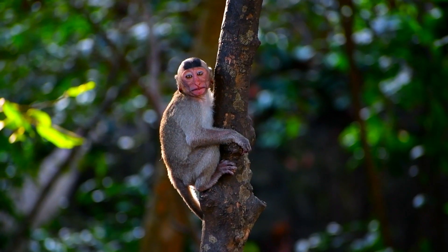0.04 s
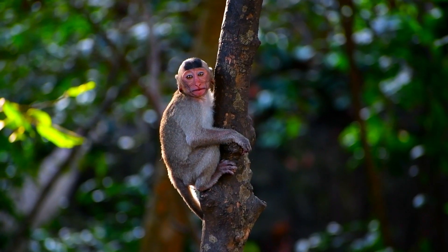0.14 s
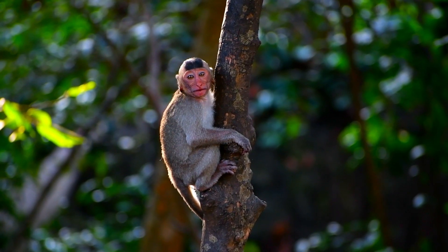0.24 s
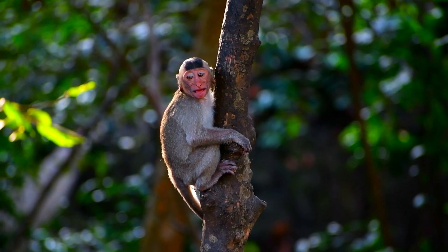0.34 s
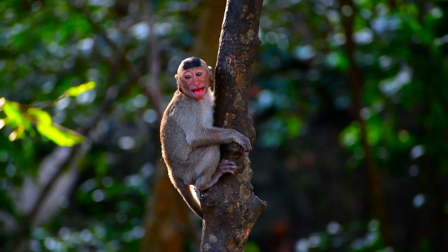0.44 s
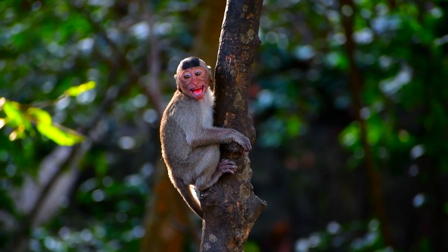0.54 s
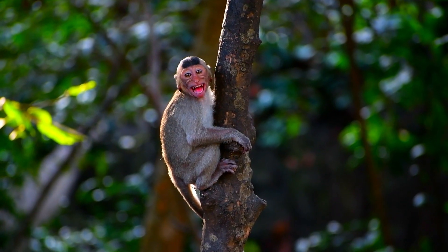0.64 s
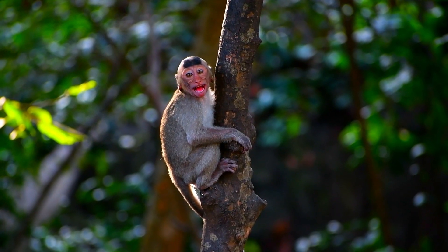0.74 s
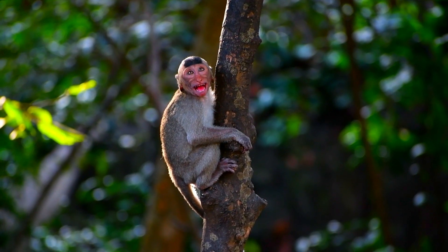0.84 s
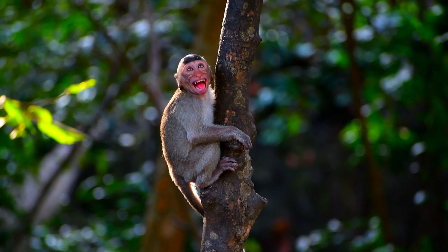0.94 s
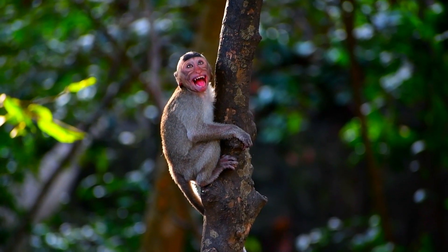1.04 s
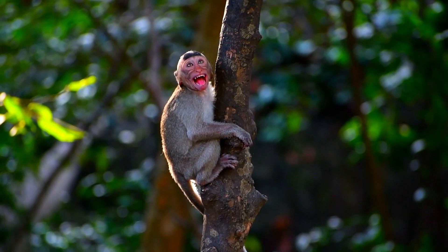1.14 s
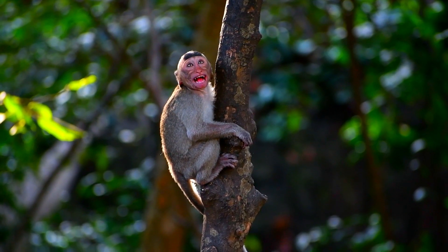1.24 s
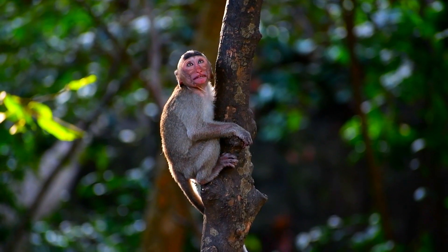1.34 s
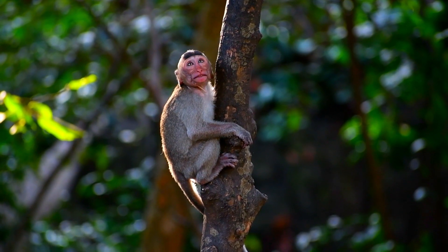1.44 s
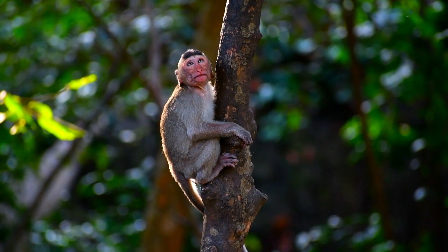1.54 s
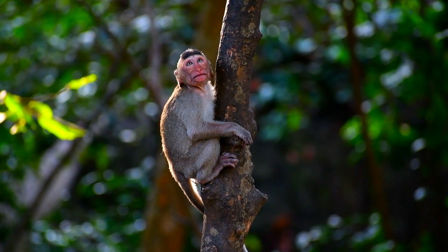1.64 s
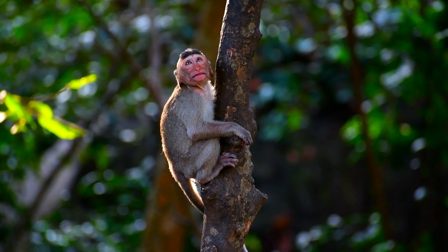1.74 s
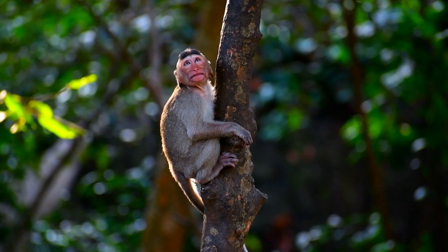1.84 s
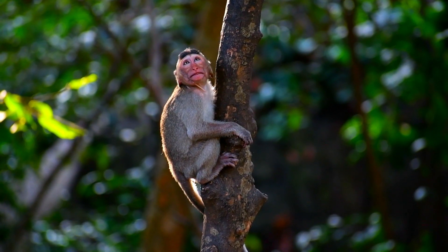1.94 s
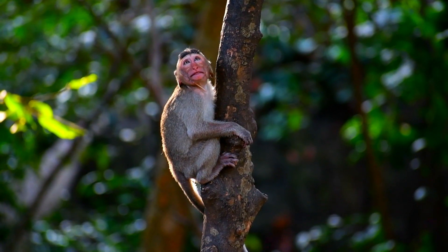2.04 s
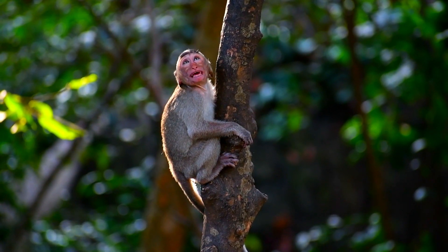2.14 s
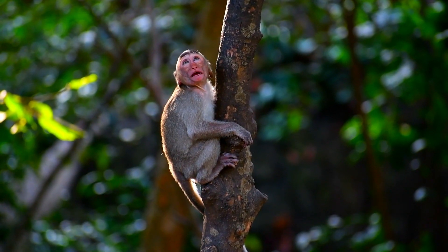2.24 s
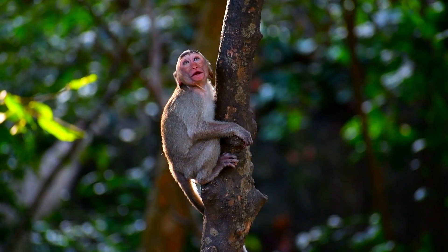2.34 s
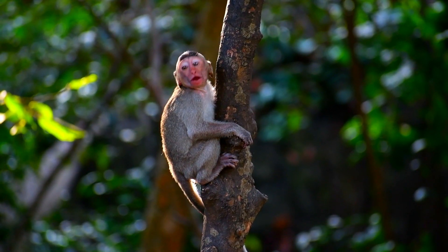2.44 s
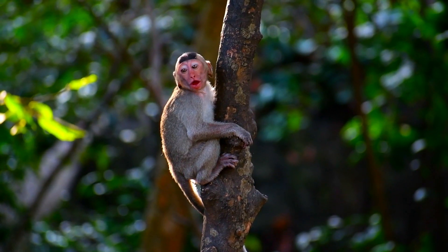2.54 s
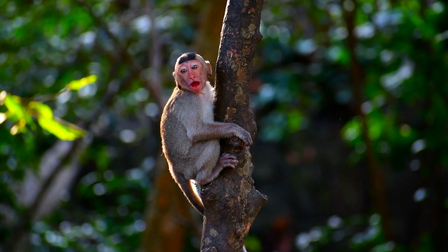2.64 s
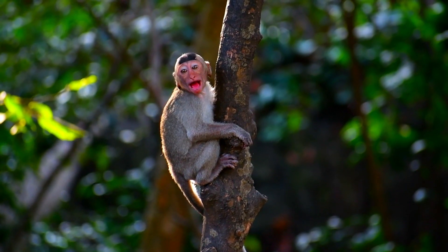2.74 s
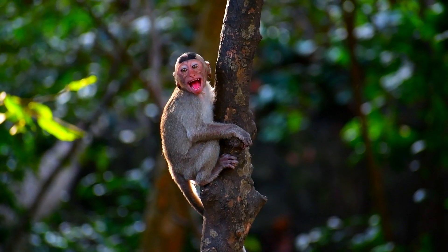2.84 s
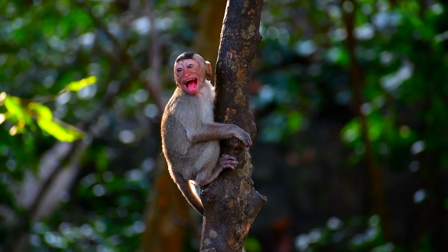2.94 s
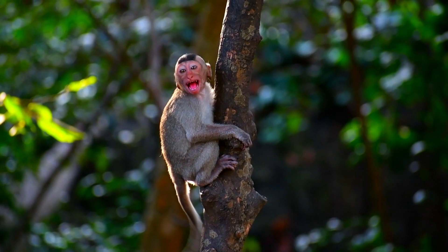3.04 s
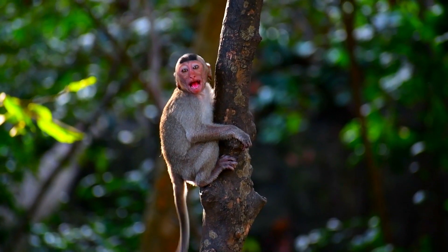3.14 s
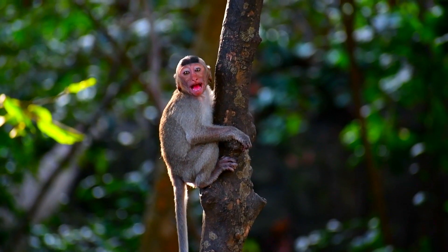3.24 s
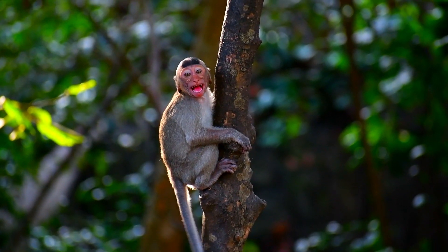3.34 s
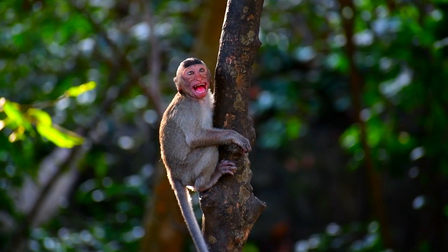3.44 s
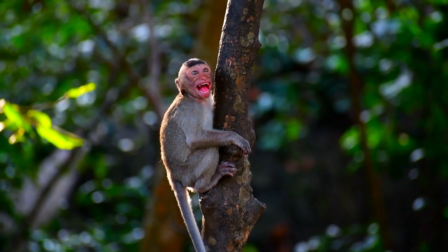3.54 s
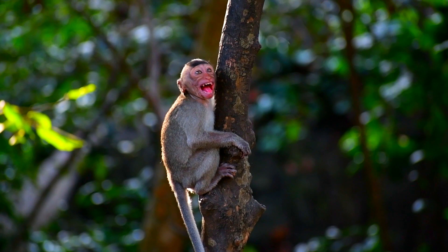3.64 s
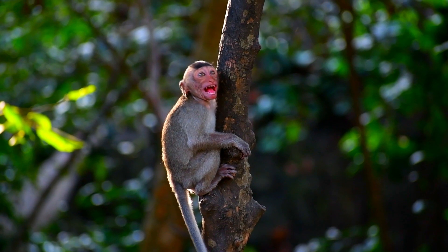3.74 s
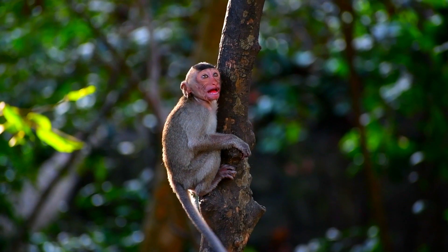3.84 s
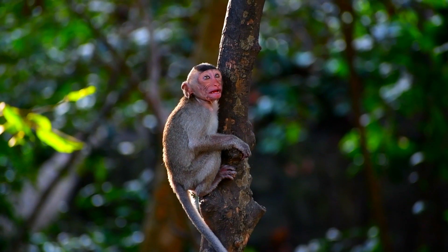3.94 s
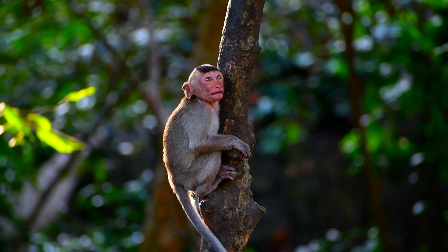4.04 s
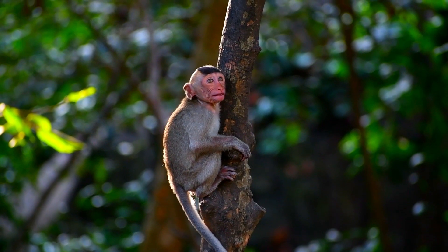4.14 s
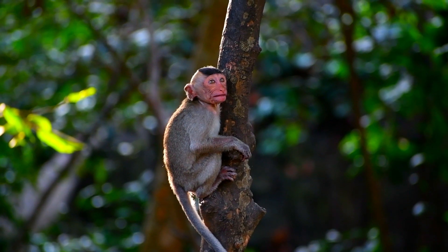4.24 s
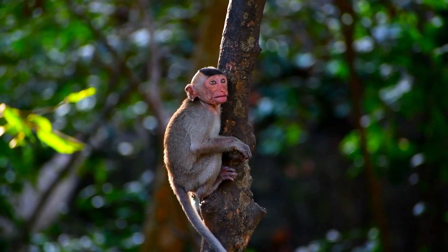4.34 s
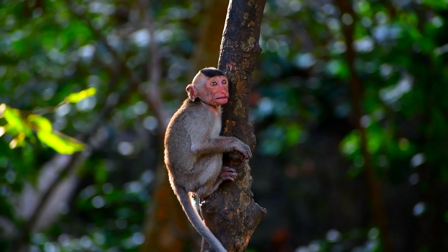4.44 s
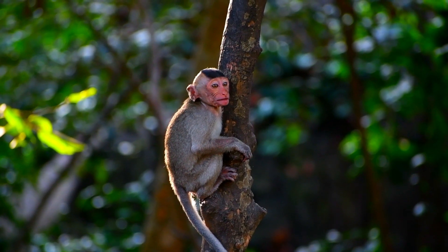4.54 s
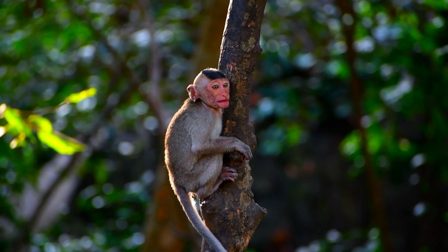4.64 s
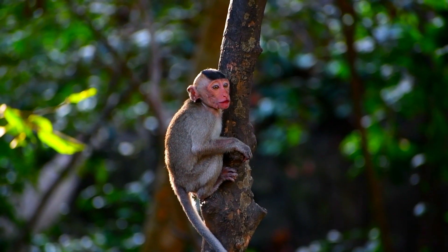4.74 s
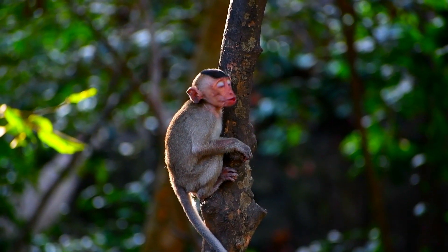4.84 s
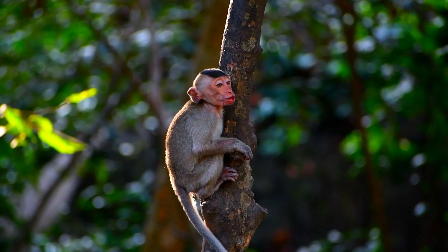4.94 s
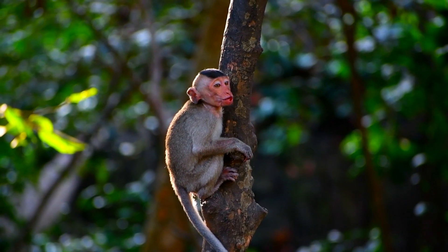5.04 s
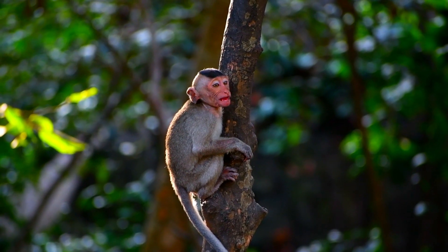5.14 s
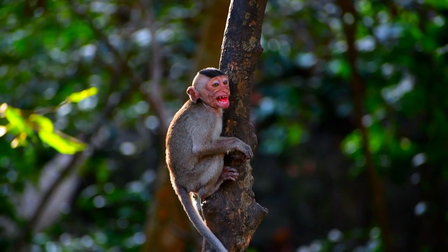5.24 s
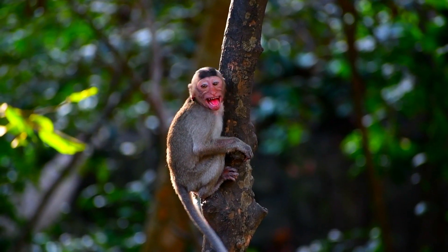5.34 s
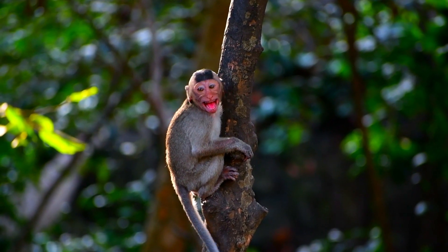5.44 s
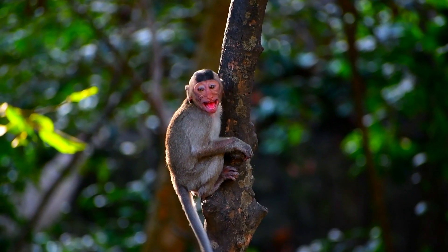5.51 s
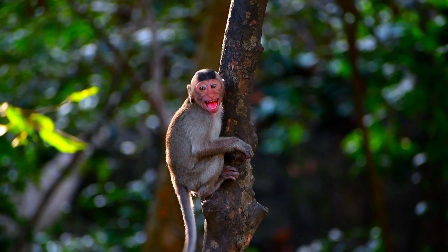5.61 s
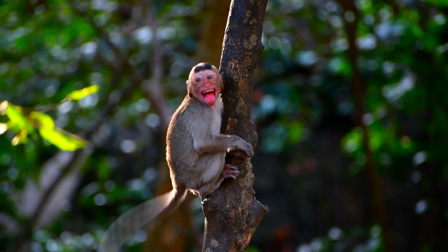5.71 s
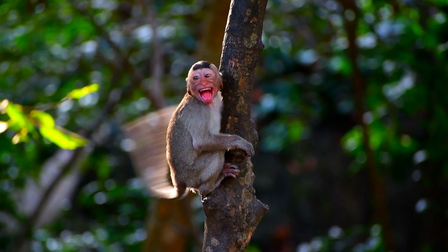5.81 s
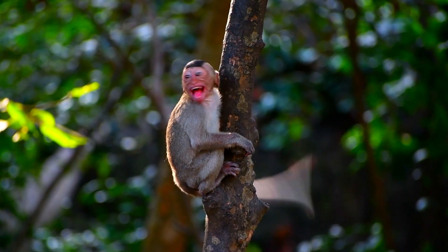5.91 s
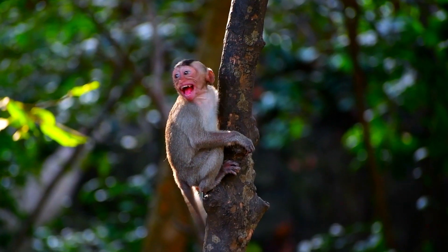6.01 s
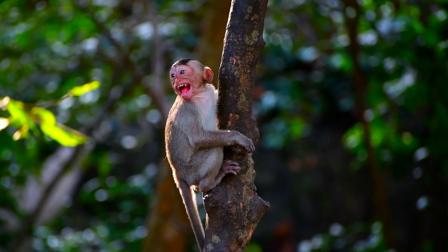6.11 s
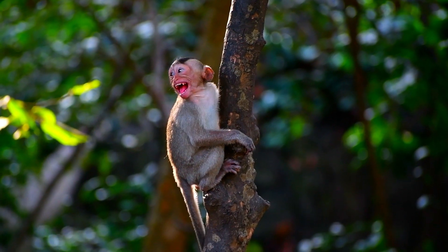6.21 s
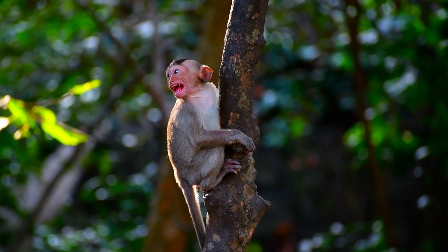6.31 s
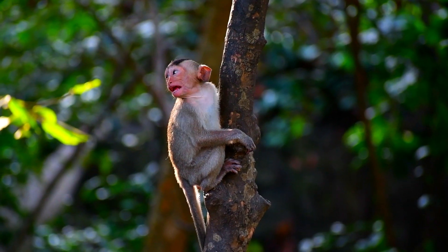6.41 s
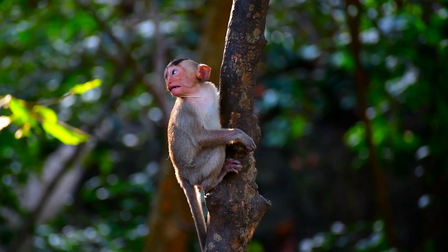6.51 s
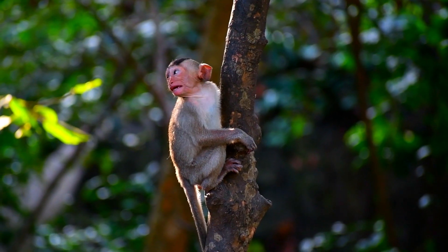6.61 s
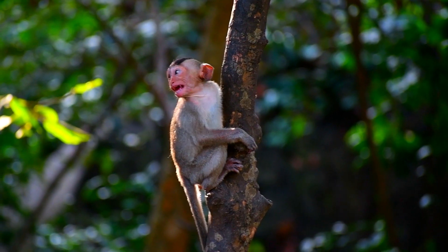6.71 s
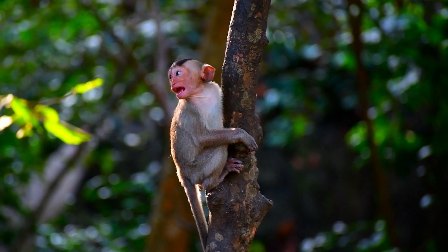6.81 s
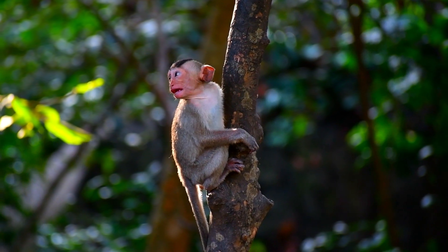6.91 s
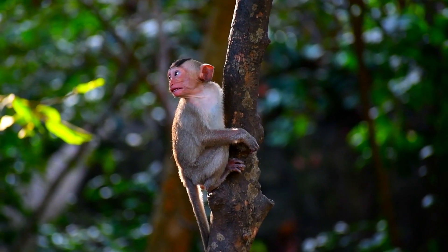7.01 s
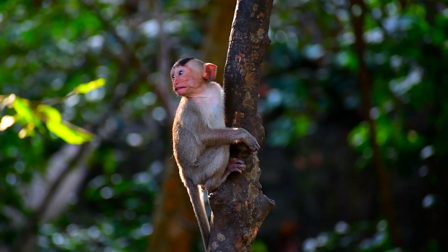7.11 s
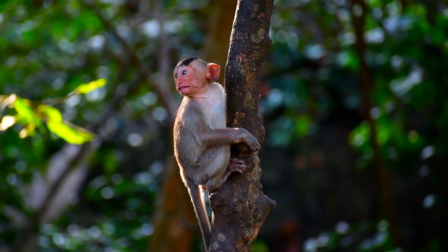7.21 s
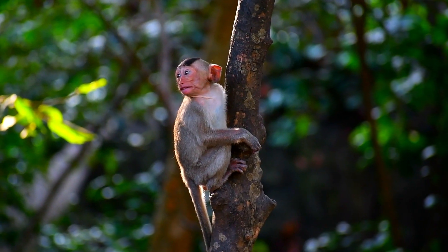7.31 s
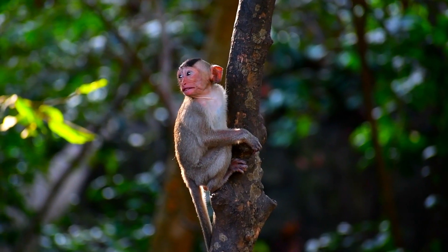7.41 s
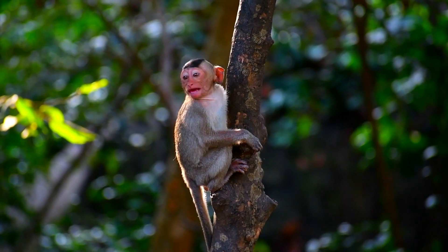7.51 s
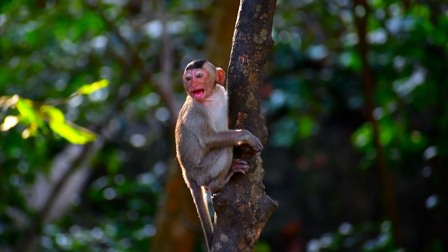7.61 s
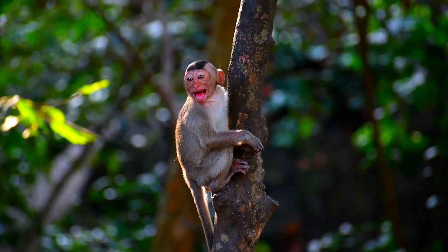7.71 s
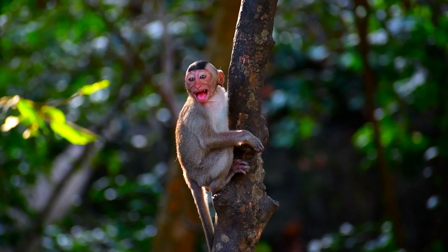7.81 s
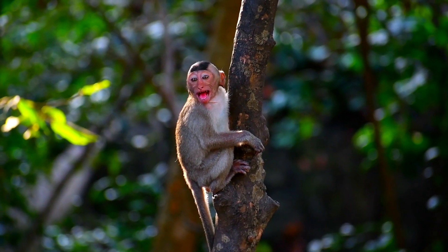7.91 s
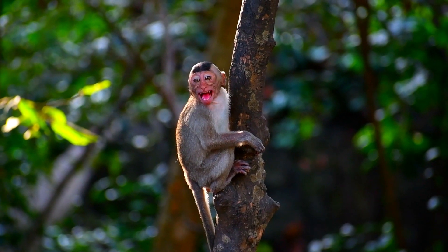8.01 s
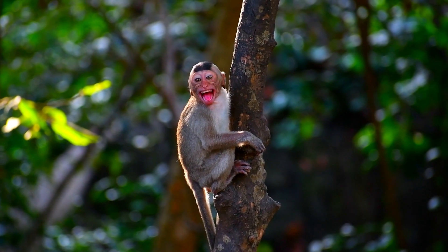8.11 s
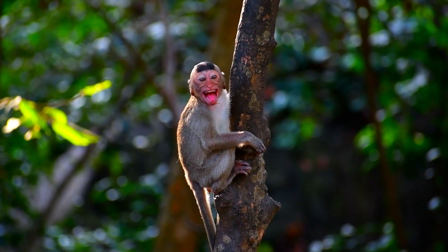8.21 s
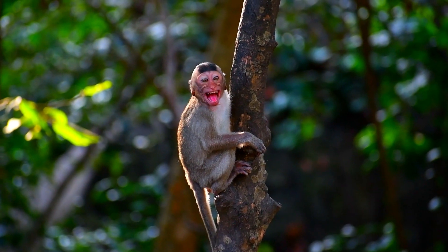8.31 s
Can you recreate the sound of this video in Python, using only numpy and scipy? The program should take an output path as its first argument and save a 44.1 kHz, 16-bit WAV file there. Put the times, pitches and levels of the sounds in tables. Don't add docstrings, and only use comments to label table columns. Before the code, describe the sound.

An infant monkey shrieks close by, coos cracking into piercing whistles and raspy squawks, while a distant bird whoops steadily in an echoing forest.

```python
import sys
import numpy as np
from scipy import signal
from scipy.fft import rfft, irfft
from scipy.io import wavfile

SR = 44100
rng = np.random.default_rng(int(sys.argv[2]) if len(sys.argv) > 2 else 0)


def to_wav(s):
    ch = np.atleast_2d(s).T
    pcm = np.round(np.clip(ch, -1, 1) * 32767)
    wavfile.write(sys.argv[1], SR, pcm.astype(np.int16))


def invert_db(x):
    u = np.asarray(x, float) / 20
    return 10 ** u


N = 368676
LEAD = SR // 4
M = N + LEAD
BREAK_HZ = 2310


def rms_one(x):
    return x / np.sqrt(np.mean(x ** 2) + 1e-20)


def at_hz(points, hz):
    return np.interp(np.log(hz), np.log(np.array(points)[:, 0]), np.array(points)[:, 1])


def band(x, low_hz, high_hz):
    return signal.sosfilt(signal.butter(2, [low_hz, min(high_hz, .45 * SR)], "band", fs=SR, output="sos"), x)


def wobble(size, hz):
    r = np.exp(-2 * np.pi * hz / SR)
    return rms_one(signal.lfilter([1], [1, -2 * r, r * r], rng.standard_normal(size + 4000))[4000:])


def eased(t, s, values):
    step = np.diff(values) / np.diff(s)
    product = step[1:] * step[:-1]
    inner = np.where(product > 0, 2 * product / (step[1:] + step[:-1] + 1e-9), 0)
    slope = np.r_[step[0], inner, step[-1]]
    i = np.clip(np.searchsorted(s, t) - 1, 0, len(s) - 2)
    h = np.diff(s)[i]
    u = np.clip((t - s[i]) / h, 0, 1)
    bend = h * u * (1 - u) * ((1 - u) * (slope[i] - step[i]) - u * (slope[i + 1] - step[i]))
    return values[i] + u * h * step[i] + bend


def unroll(rows):
    s, *columns = np.transpose(rows)
    first = round(s[0] * SR) + LEAD
    t = np.arange(max(min(round(s[-1] * SR) + LEAD, M) - first, 2)) / SR
    edge = np.clip(np.minimum(t, t[-1] - t) / 0.00096, 0, 1)
    return first, edge, [eased(t + s[0], s, c) for c in columns]


def add(track, first, sound):
    track[first:first + len(sound)] += sound[:len(track) - first]


def infant():
    # t/s, f/Hz, in one coo also effort level/dB
    coos = [
        [(.322, 1030), (.354, 1348), (.378, 1460)],
        [(.838, 980), (.856, 1396), (.868, 1560)],
        [(1.13, 1666), (1.136, 1507), (1.148, 1380)],
        [(2.075, 1090), (2.108, 1310), (2.12, 1612), (2.136, 1560), (2.146, 1890)],
        [(2.147, 1822), (2.165, 1746), (2.186, 1610)],
        [(2.435, 863), (2.483, 985), (2.585, 1043), (2.645, 1135), (2.686, 1318), (2.7, 1345), (2.733, 1770)],
        [(3.232, 920, -5), (3.255, 1105, 2), (3.272, 1153, 1), (3.281, 992, -8), (3.308, 1130, -1)],
        [(3.31, 1366), (3.348, 1787)],
        [(4.615, 960), (4.665, 1277)],
        [(4.672, 1417), (4.706, 1450), (4.735, 1326), (4.752, 1180)],
        [(4.925, 958), (4.955, 1063), (5.049, 1246), (5.115, 1562), (5.127, 1830)],
        [(6.645, 990), (6.677, 1078), (6.699, 1447), (6.712, 1506), (6.733, 1555)],
        [(6.746, 1261), (6.765, 1162), (6.79, 1046)],
        [(7.505, 1132), (7.531, 1528), (7.557, 1510), (7.567, 1666)],
        [(8.0, 1172), (8.024, 1738)],
    ]
    # t/s, f/Hz, effort level/dB
    whistles = [
        [(.868, 2790, 0.5), (.896, 6060, -1), (.918, 7800, 3.5), (.955, 10750, -3), (1.0, 11620, -1),
         (1.054, 10400, -2), (1.092, 8330, 4.5), (1.098, 7670, -5), (1.108, 6960, -17)],
        [(2.733, 2920, -2), (2.757, 5660, 2.5), (2.787, 8500, 0), (2.817, 10040, -2.5), (2.857, 10900, 2),
         (2.935, 11550, 1), (2.959, 10700, 3.5), (2.971, 9140, 5), (2.978, 7200, -9)],
        [(3.35, 3140, -9.5), (3.392, 5160, -4), (3.412, 5900, -4), (3.508, 6700, -1.5), (3.536, 8500, 1),
         (3.572, 10800, -4.5), (3.614, 11330, -4)],
        [(5.128, 2570, 8), (5.142, 2860, -5), (5.16, 4030, 10), (5.214, 8780, -3), (5.25, 10670, 3),
         (5.308, 13050, 2), (5.334, 12350, 1), (5.355, 10060, -1.5), (5.364, 9600, 7)],
        [(5.647, 8370, -2.5), (5.67, 12300, -1), (5.712, 14000, -0.5), (5.75, 12800, -0.5), (5.784, 12100, -1),
         (5.8, 11100, 0.5), (5.812, 10900, 3.5)],
        [(5.814, 11700, -6), (5.846, 10550, -6.5), (5.872, 9840, -2), (5.908, 9390, -2), (6.014, 8290, 1)],
        [(6.06, 8320, -1), (6.074, 8490, 2.5), (6.124, 9100, 4), (6.2, 8730, 8), (6.22, 8100, 1.5),
         (6.243, 7150, 4)],
        [(8.052, 8380, 0.5), (8.078, 11100, -1.5), (8.125, 12960, 1), (8.18, 11000, -3.5), (8.226, 8280, 2.5),
         (8.234, 7380, -14), (8.248, 7000, 0)],
    ]
    # t/s, f/Hz, the long ones also effort level/dB
    shrieks = [
        [(-.12, 7080), (-.07, 6540)],
        [(-.06, 4105), (-.02, 4040)],
        [(.404, 2705), (.428, 2743)],
        [(.428, 2860), (.459, 2723), (.492, 2820)],
        [(.492, 2930), (.514, 3470)],
        [(.515, 3060, -7), (.524, 3394, -0.5), (.554, 4810, 3.5), (.568, 5000, 1), (.586, 5750, 2.5),
         (.618, 5080, -0.5), (.633, 3960, 3.5), (.643, 3940, -11)],
        [(.643, 3850), (.668, 3400)],
        [(.595, 4250), (.627, 3630)],
        [(1.138, 2850), (1.158, 2310)],
        [(2.985, 4080), (3.005, 3630)],
        [(3.69, 4194), (3.714, 3300)],
        [(5.388, 3777, -2), (5.408, 4194, 1.5), (5.432, 4040, -1.5), (5.456, 3360, -1)],
        [(5.615, 2730), (5.628, 3744)],
        [(6.014, 8270), (6.06, 8200)],
        [(7.568, 2652, 2), (7.592, 2753, -3), (7.615, 2880, 0.5), (7.635, 2950, -1.5), (7.66, 3092, -5),
         (7.704, 3410, 1.5), (7.72, 3674, 5), (7.755, 4890, -1.5), (7.779, 5520, -3)],
        [(7.78, 4650), (7.81, 4070), (7.848, 3510)],
        [(8.022, 3270), (8.034, 4500)],
        [(8.225, 4630), (8.262, 3760)],
        [(8.305, 8300), (8.325, 9900), (8.359, 11100)],
        [(1.131, 4790), (1.137, 4600), (1.146, 4400)],
        [(6.733, 3110), (6.752, 3000)],
        [(3.615, 11320, -13), (3.634, 10630, -3), (3.652, 10270, -2.5), (3.668, 9030, 2), (3.681, 7900, -3),
         (3.69, 6630, -2)],
        [(5.366, 10250), (5.38, 8830), (5.39, 7400)],
        [(.586, 9300), (.66, 8300)],
        [(5.394, 5970), (5.44, 5480)],
        [(3.69, 5800), (3.706, 4600)],
    ]
    # level/dB, swell start to end/dB, rasp over voice/dB, fold pulse slope/(dB/octave)
    coo_manner = [(-52, -10, -26, -4), (-47, 4, -12.5, -3), (-38.5, -23, 2, -6.5), (-48.5, -9.5, -20, -8.5),
                  (-54, -4.5, -12, -3), (-48, 10, -16.5, -9.5), (-47.5, -7, -31, -3), (-41.5, 0, -22, -6.5),
                  (-50.5, -7, -30, -19.5), (-52.5, 1, -21, -9), (-49.5, -1.5, -21, -9),
                  (-43.5, -2.5, -23, -6.5), (-39, 8.5, -19, -6.5), (-47.5, 0, -22, -3), (-46, 2, -20, -4.5)]
    whistle_manner = [(-28, 2, -7, -18), (-28.5, -7, 2.5, -26), (-22, -11, -12.5, -11.5),
                      (-34, 11.5, -7.5, -19), (-27, -0.5, -5.5, -14), (-22.5, -3.5, -15, -12),
                      (-30.5, -11, -23, -32), (-28, 6, -10.5, -24)]
    shriek_manner = [(-31.5, 14, 9, -20), (-30.5, -6, 6, -24), (-30.5, 5, -18, -7.5), (-42.5, 6, 12.5, -15),
                     (-34, -5, -9, -9), (-23, 4, -6, -10), (-35, -8, 19, -18), (-26.5, 6, -4, -5),
                     (-34, 9, -11, -3), (-35.5, 0, 8, -23), (-28.5, -8, 20, -8), (-26.5, -7, 2.5, -11),
                     (-41, 24, 1, -14), (-33.5, 10, -4, -12), (-27, 13, -4.5, -9.5), (-25.5, -9.5, 0.5, -9),
                     (-25, -8, -27, -23), (-47.5, -1.5, 3, -10), (-26.5, -4, -11, -22),
                     (-28.5, -6, -1, -22), (-36.5, 6, 10, -13), (-26, 1, -12, -24), (-27.5, 5, -5, -11),
                     (-43, -15, 37, -20), (-32.5, 7, 2.5, -23), (-30, 5, -8, -18)]
    # nasal dip f/Hz, width/Hz, depth/0-1, fundamental level/dB, above the dip level/dB
    coo_mouth = [(7000, 2600, 0.9, 2, 2.5), (6400, 1600, 0.5, 1.5, -4), (6240, 610, 1, -11.5, 0),
                 (6500, 2800, 0.94, 10, 17.5), (7000, 1500, 0.45, 8.5, -1), (6150, 1940, 0.92, -3, 9),
                 (6600, 1600, 0.7, 2, 1), (7000, 3600, 0.67, -13, -2), (5950, 2600, 0.8, -2, -1),
                 (6700, 2400, 0.93, -2.5, 6.5), (5870, 2800, 1, 1, 8.5), (6800, 1600, 0.92, -3.5, 2.5),
                 (6270, 5400, 0.4, -6, -6), (6260, 2500, 1, 3, 4), (5800, 1500, 0.6, -3.5, -3.5)]
    open_mouth = (6280, 1300, 0.82, 0, -1.6)
    # second partial level/dB, third partial level/dB
    coo_pulse = [(4, -6), (6.5, -12), (-1.5, 2), (2.5, 6.5), (1, 0), (3.5, 2.5), (5, 8.5), (-1, -10),
                 (2, 2), (2, 0), (3.5, 1.5), (5, -2.5), (3.5, 9), (3, 3), (0.5, -1.5)]
    head_pulse = (0, -1.5)
    join_s = .012
    loudest_rasp_db = -33

    voice, breath = np.zeros((2, M))
    spectrum = rfft(band(band(rng.standard_normal(M), 2300, 16000), 2000, 16000))
    bins_hz = np.arange(len(spectrum)) * SR / M
    rasp = rms_one(irfft(spectrum * throat_gain(bins_hz, open_mouth) / (1 + bins_hz / 6000), M))
    hiss = rms_one(band(rng.standard_normal(M), 6300, 6400))

    cries = list(coos) + list(whistles) + list(shrieks)
    starts, ends = np.transpose([(rows[0][0], rows[-1][0]) for rows in cries])
    mouths = coo_mouth + [open_mouth] * len(cries)
    pulses = coo_pulse + [head_pulse] * len(cries)
    manners = coo_manner + whistle_manner + shriek_manner
    for rows, mouth, pulse, (*breath_db, slope) in zip(cries, mouths, pulses, manners):
        opens = np.abs(ends - rows[0][0]).min() > join_s
        closes = np.abs(starts - rows[-1][0]).min() > join_s
        if not closes:
            rows = rows[:-1] + [(rows[-1][0] + join_s / 4, *rows[-1][1:])]
        first, edge, (hz, *effort_db) = unroll(rows)
        voiced_db, rasp_db = breathing(hz, *breath_db, opens, closes) + sum(effort_db)

        rough = np.clip(invert_db(rasp_db - voiced_db) * 1.2 - .15, 0, 1)
        tremor = .005 * wobble(len(hz), 45)
        jitter = (.002 + .04 * rough) * wobble(len(hz), 350)
        phase = np.cumsum(hz * (1 + tremor + jitter)) * 2 * np.pi / SR
        shimmer = invert_db((.9 + 3.0 * rough) * wobble(len(hz), 220))
        thin = 1 / (1 + (BREAK_HZ / hz) ** 8)
        voiced = partials(hz, phase, thin, slope, pulse, mouth)

        gate = 1 + 0.11 * np.sin(phase * (1 - thin))
        tight = 1 / (1 + (7000 / hz) ** 6)
        span = slice(first, first + len(hz))
        noise = (1 - .7 * tight) * rasp[span] + .8 * tight * hiss[span]
        add(voice, first, edge * invert_db(voiced_db) * shimmer * voiced)
        add(breath, first, edge * invert_db(np.minimum(rasp_db, loudest_rasp_db) - 6) * gate * noise)
    side_lines = 1.5 * np.diff(voice * beating(), prepend=0)
    return voice + side_lines + breath


def partials(hz, phase, thin, slope, pulse, mouth):
    chest_top_hz = 12600
    second_db, third_db = pulse
    k = np.arange(1, 2 + int(16000 / hz.min()))[:, None]
    weight = invert_db(slope * np.log2(k) + second_db * (k == 2) + third_db * (k == 3))
    weight = weight * throat_gain(k * hz, mouth) ** (1 - 0.085 * thin) * (k * hz < .45 * SR)
    weight /= 1 + (1 - thin) * (k * hz / chest_top_hz) ** 10
    weight[0] *= invert_db(mouth[3] * (1.5 - thin))
    voiced = (weight * np.sin(k * phase)).sum(axis=0) / np.sqrt((weight ** 2).sum(axis=0) / 2)
    return voiced * (1 + 0.95 * thin / (1 + ((hz - 3300) / 300) ** 2))


def throat_gain(hz, mouth):
    # f/Hz, width/Hz, level/dB
    resonances = [(1940, 4900, -9), (3300, 240, -0.5), (5700, 3650, 10.5), (8900, 2300, 5),
                  (10640, 1600, -13), (12450, 3700, 3)]
    dip_hz, dip_width, depth, _, top_db = mouth
    peaks = sum(invert_db(db) / (1 + (2 * (hz - centre) / width) ** 2) for centre, width, db in resonances)
    dip = 1 - min(depth, .98) / (1 + (2 * (hz - dip_hz) / dip_width) ** 4)
    return peaks * dip * invert_db(top_db * (hz > dip_hz))


def breathing(hz, level_db, swell_db, hoarse_db, opens, closes):
    # f/Hz, level/dB
    carry = [(3000, -6), (5200, -8.5), (7000, -7.5), (8600, 0), (9400, -1.5), (10250, -7.5), (11400, -3),
             (12800, -2)]
    effort_db_per_oct, strain_db_per_oct = 9.5, 20
    clear_db_per_oct = -9.5
    chest_onset_db, chest_onset_s = -10, 0.009
    head_onset_db, head_onset_s = -2, 0.0024
    head_fade_db, head_fade_s = -9, 0.0057
    crack_db, crack_s = 16, 0.0053
    dying_db = -3

    t = np.arange(len(hz)) / SR
    left = t[-1] - t
    voiced_db = level_db + swell_db * (t / t[-1] - .5)
    if hz.mean() < BREAK_HZ:
        octaves = np.log2(hz / 1000)
        onset = opens * chest_onset_db * np.exp(-t / chest_onset_s)
        voiced_db = voiced_db + effort_db_per_oct * octaves + onset
        hoarse_db = hoarse_db + strain_db_per_oct * octaves
    else:
        onset = opens * head_onset_db * np.exp(-t / head_onset_s)
        fade = closes * head_fade_db * np.exp(-left / head_fade_s)
        voiced_db = voiced_db + at_hz(carry, hz) + onset + fade
        hoarse_db = hoarse_db + clear_db_per_oct * np.log2(hz / 3000)
    crack = closes * crack_db * np.exp(-left / crack_s) * (swell_db > dying_db)
    return np.array([voiced_db, voiced_db + hoarse_db + crack])


def beating():
    # from t/s, to t/s, from f/Hz, to f/Hz, depth/0-1, irregularity/0-1
    beats = [(.404, .43, 910, 920, .35, .01), (.43, .515, 1000, 1450, .9, .07),
             (2.147, 2.186, 650, 600, .5, .15), (2.715, 2.735, 760, 860, .2, .05),
             (3.40, 3.48, 900, 1900, .06, .01), (5.39, 5.44, 450, 600, .9, .3),
             (5.83, 6.245, 3000, 3300, .03, .24), (5.83, 6.245, 5400, 6000, .024, .2),
             (6.012, 6.06, 450, 450, .5, .5), (6.208, 6.245, 500, 900, .8, .5),
             (7.568, 7.69, 880, 1000, .8, .22), (7.7, 7.772, 1680, 2640, .14, .01),
             (7.76, 7.83, 900, 800, .4, .2)]
    swing = np.zeros(M)
    for start, end, from_hz, to_hz, depth, loose in beats:
        first, edge, (hz,) = unroll([(start, from_hz), (end, to_hz)])
        phase = np.cumsum(hz * (1 + loose * wobble(len(hz), 580))) * 2 * np.pi / SR
        add(swing, first, depth * edge * np.sin(phase))
    return swing


def slack_edge():
    # t/s, f/Hz, level/dB
    strands = [
        [(.424, 3200, -40), (.45, 2000, -52)],
        [(.415, 1847, -57), (.46, 1460, -56), (.512, 1657, -49)],
        [(1.1, 5000, -68), (1.13, 3100, -61)],
        [(2.146, 2120, -52), (2.162, 2520, -44), (2.18, 2340, -51)],
        [(3.41, 5340, -62), (3.45, 5020, -41), (3.485, 4550, -45)],
        [(4.745, 2610, -54), (4.79, 2680, -56)],
        [(5.135, 2210, -50), (5.165, 2790, -39.5)],
        [(5.395, 3190, -55), (5.43, 2770, -44)],
        [(5.435, 2500, -45), (5.458, 2090, -54)],
        [(6.612, 880, -64), (6.65, 1010, -51)],
        [(5.614, 1400, -55), (5.63, 2250, -53)],
        [(7.566, 1780, -47), (7.65, 1900, -67)],
        [(7.735, 3650, -33), (7.785, 3680, -51)],
        [(7.778, 5450, -40), (7.81, 4700, -49)],
        [(1.138, 5850, -37), (1.157, 4350, -44)],
        [(5.398, 4600, -43), (5.424, 4410, -43)],
        [(.46, 5570, -44), (.492, 5700, -38)],
        [(7.57, 5380, -38), (7.62, 5670, -44), (7.68, 5600, -38)],
        [(7.82, 2190, -50), (7.852, 1870, -51.5)],
    ]
    # t/s, f/Hz, level/dB
    flutters = [
        [(5.835, 4400, -58), (5.87, 4260, -56.5), (5.95, 4050, -71)],
        [(6.0, 5000, -59), (6.07, 4370, -61)],
        [(6.215, 5010, -59), (6.26, 3890, -47)],
        [(6.688, 2334, -42), (6.726, 2370, -49)],
        [(5.35, 1310, -61), (5.41, 1175, -59)],
        [(.58, 1048, -59.5), (.68, 1043, -56)],
    ]
    second_db = -26
    sung = tone(strands, [(second_db, .03)] * len(strands), third_db=-24)
    return sung + tone(flutters, [(second_db, .06)] * len(flutters), third_db=-40)


def tone(calls, voices, third_db):
    out = np.zeros(M)
    for rows, (second_db, rough) in zip(calls, voices):
        first, edge, (hz, level_db) = unroll(rows)
        phase = np.cumsum(hz * (1 + rough * wobble(len(hz), 158.0))) * 2 * np.pi / SR
        wave = np.sin(phase) + invert_db(second_db) * np.sin(2 * phase) + invert_db(third_db) * np.sin(3 * phase)
        add(out, first, np.sqrt(2) * edge * invert_db(level_db) * wave)
    return out


def twigs():
    # t/s, peak level/dB, centre f/Hz, t60/s
    ticks = [(1.37, -51, 9000, .02), (4.275, -53, 5500, .015), (6.268, -46, 3600, .03),
             (1.447, -56, 6000, .02), (1.737, -50, 4020, .02), (1.951, -51, 2200, .04),
             (2.077, -54, 7500, .03), (4.048, -58, 8000, .1), (4.163, -46, 1260, .083),
             (4.178, -51, 1990, .12), (4.79, -50, 1490, .19), (5.687, -46, 4500, .012),
             (1.155, -31, 4500, .008), (2.992, -31, 4200, .008), (2.999, -33, 4000, .008),
             (3.697, -28, 4500, .006), (3.703, -25, 4500, .006)]
    out, t = np.zeros(M), np.arange(SR // 5) / SR
    for s, db, hz, t60 in ticks:
        crack = band(rng.standard_normal(len(t)), hz / 2.06, hz * 1.32)
        add(out, round(s * SR) + LEAD, invert_db(db) * rms_one(crack) * invert_db(-60 * t / t60))
    return out


def pips():
    pip_starts = [0.463, 1.449, 2.475, 2.939, 3.399, 3.869, 4.805, 5.294, 5.75, 6.225, 6.676, 7.149, 7.64,
                  8.103]
    peaks_db = rng.normal(-60, 1.9, len(pip_starts))
    calls = [[(s, 700, db + 0.5), (s + 0.016, 705, db), (s + 0.046, 700, db - 10)]
             for s, db in zip(pip_starts, peaks_db)]
    return tone(calls, [(-46, 0.0022)] * len(calls), third_db=-50)


def whoops():
    # t/s, peak level/dB
    first_whoop = (-0.15, -30)
    # t/s, peak level/dB
    later_whoops = [(0.954, -40), (2.033, -40), (3.279, -39.5), (4.336, -38), (5.429, -39.5), (6.456, -40),
                    (7.486, -39.5)]
    # t from its start/s, f/Hz, level/dB
    contour = [(-.003, 725, -8.5), (.006, 808, -2.5), (.025, 851, 2.5), (.036, 836, -2.5), (0.047, 891, 3),
               (.065, 860, -12.5), (.078, 885, -34)]
    calls = [[(s + dt, hz * change, db + level - 4.0) for dt, hz, level in contour]
             for (s, db), change in zip([first_whoop] + later_whoops, rng.normal(1, 0.0058, 8))]
    return tone(calls, [(-27.5, 0.0014)] * len(calls), third_db=-52)


def far_callers():
    # t/s, f/Hz, level/dB
    clear = [
        [(.835, 1007, -48), (.935, 987, -40), (.955, 960, -56)],
        [(2.665, 551, -76), (2.68, 536, -49), (2.715, 685, -47), (2.76, 777, -41), (2.87, 836, -49),
         (3.04, 763, -48), (3.09, 718, -61)],
    ]
    # t/s, f/Hz, level/dB
    hoarse = [
        [(1.153, 1039, -38), (1.2, 1031, -48.5), (1.32, 1035, -49.5), (1.385, 1015, -62), (1.402, 1002, -44),
         (1.42, 980, -58)],
        [(1.14, 1960, -57), (1.42, 1727, -58), (1.55, 1575, -60)],
        [(1.43, 554, -59), (1.55, 678, -59), (2.0, 735, -67.5)],
        [(1.65, 896, -55.5), (1.72, 964, -59.5), (2.0, 964, -72)],
        [(7.28, 550, -61), (7.4, 555, -66)],
    ]
    # second partial level/dB, pitch unsteadiness/0-1
    far_voices = [(-30, .008), (-23, .002), (-26, .05), (-26, .14), (-26, .05), (-5, .02), (-30, .01)]
    return tone(clear + hoarse, far_voices, third_db=-18.0)


def forest(x, side_db):
    # f/Hz, t60/s
    decay = [(500, 0.87), (3000, 0.53), (9000, 0.49), (15000, 0.16)]
    t, tail = np.arange(SR) / SR, 0
    for hz in 350 * 2 ** np.arange(0, 5.6, .5):
        noise = band(rng.standard_normal((2, SR)), hz / 2 ** .25, hz * 2 ** .25)
        tail = tail + noise * invert_db(-60 * t / at_hz(decay, hz))
    tail = tail * np.clip(t / 0.0015, 0, 1)
    mid, side = [signal.fftconvolve(x, v / np.sqrt(np.sum(v ** 2)))[:M] for v in tail]
    return mid + invert_db(side_db) * side * [[1], [-1]]


def air():
    # f/Hz, level/dB
    colour = [(30, -18), (120, 0), (182, -3), (250, -1.5), (433, -12.5), (641, -15), (790, -14.5),
              (3000, -23.5), (5200, -26), (6080, -23.5), (15600, -26.5)]
    # f/Hz, side minus mid level/dB
    spread = [(60, -29), (110, -18), (200, -23.5), (380, -11.5), (1290, -9), (4400, -0.5), (15000, -4)]
    out, edges = 0, 44 * 2 ** np.arange(0, 9.3, 1 / 3)[:27]
    white = rng.standard_normal((2, 2, M))
    for k, (low, high) in enumerate(zip(edges, edges[1:])):
        mid, side = band(white[k % 2], low, high)
        hz = np.sqrt(low * high)
        flicker = invert_db(1.34 * np.repeat(wobble(M // 100 + 1, 350), 100)[:M])
        stereo = mid + invert_db(at_hz(spread, hz)) * side * [[1], [-1]]
        out = out + invert_db(at_hz(colour, hz)) * flicker * stereo
    return invert_db(-51.5 - 1.5) * rms_one(out)


def engines():
    # t/s, low drone level/dB, high drone level/dB
    hum = [(0.0, -66, -68), (2.4, -58, -62.5), (4.6, -74, -67.5), (5.8, -61.5, -58.5), (8.36, -76, -55)]
    # f/Hz, width/Hz
    drones = [
        (54, 9),
        (248, 9.1),
    ]
    s, *levels = np.transpose(hum)
    t = (np.arange(M) - LEAD) / SR
    out = np.zeros(M)
    for (hz, width), db in zip(drones, levels):
        drone = rms_one(band(rng.standard_normal(M), hz - width / 2, hz + width / 2))
        out += invert_db(np.interp(t, s, db) - 1.5) * drone
    return out


def scene():
    near = infant() + slack_edge() + twigs() + pips()
    far = whoops() + far_callers()
    wet = forest(invert_db(-11.5) * near, side_db=-56) + forest(invert_db(-9.5) * far, side_db=-54.0)
    return (near + far + wet + air() + engines())[:, LEAD:]


def low_pass(x):
    return signal.sosfilt(signal.butter(12, 15750, fs=SR, output="sos"), x)


def record(dry):
    return low_pass(dry)


dry = scene()
out = record(dry)
to_wav(out)
```